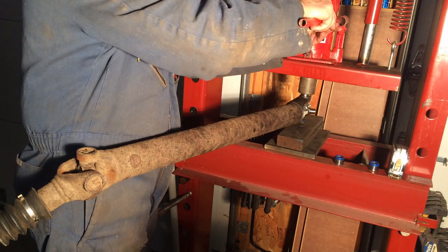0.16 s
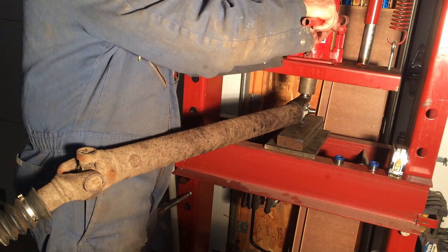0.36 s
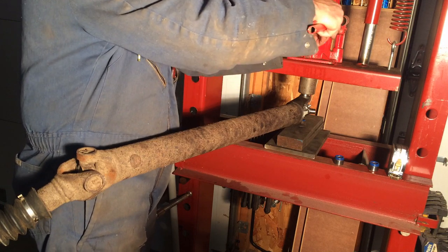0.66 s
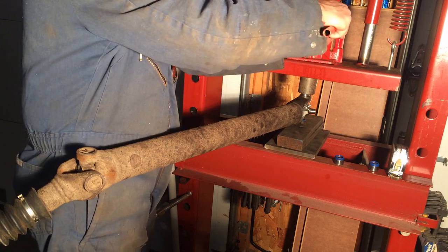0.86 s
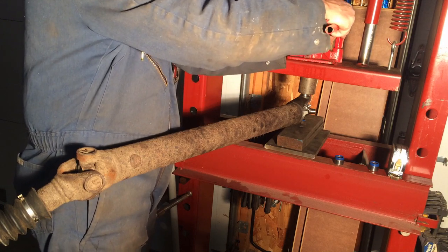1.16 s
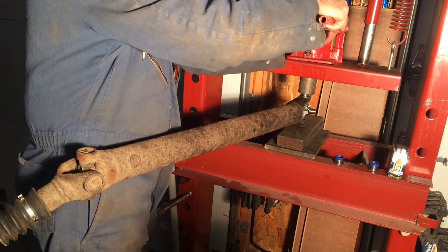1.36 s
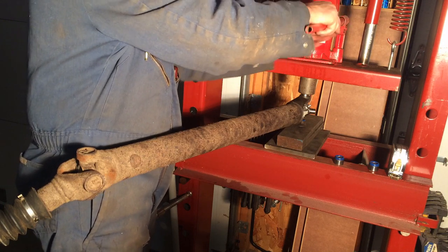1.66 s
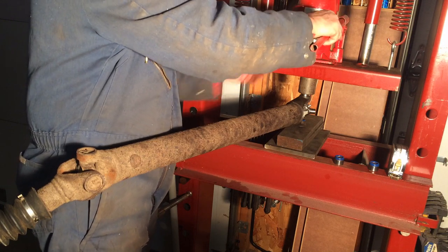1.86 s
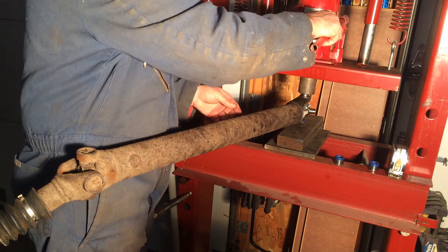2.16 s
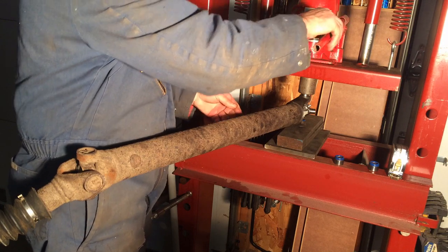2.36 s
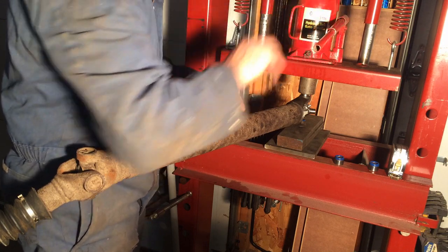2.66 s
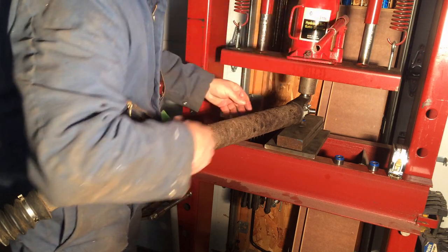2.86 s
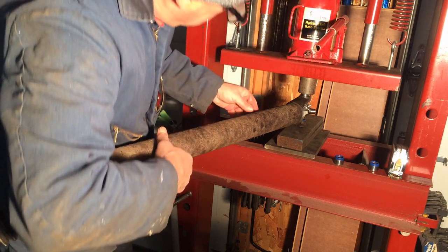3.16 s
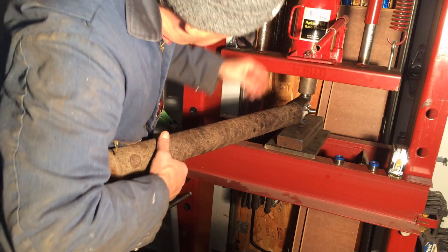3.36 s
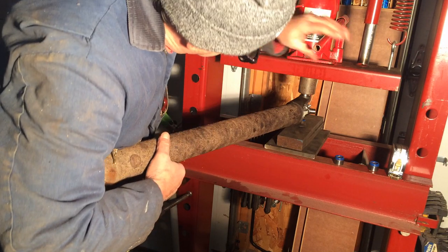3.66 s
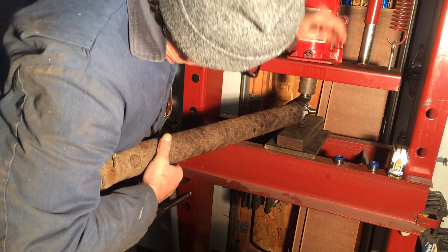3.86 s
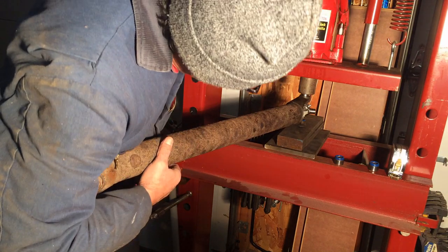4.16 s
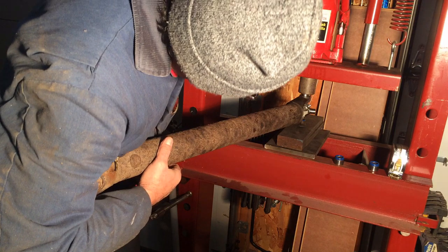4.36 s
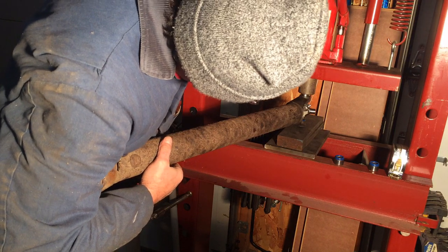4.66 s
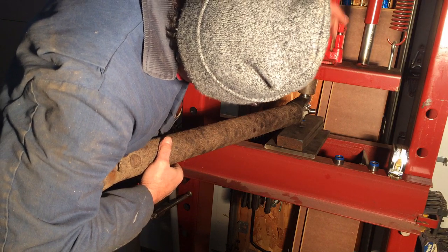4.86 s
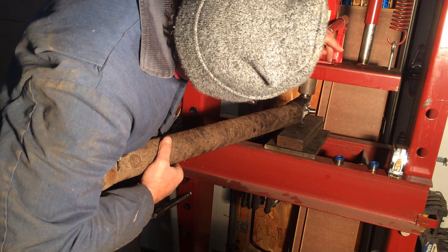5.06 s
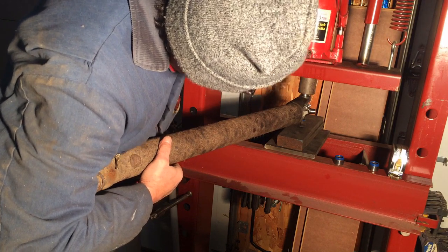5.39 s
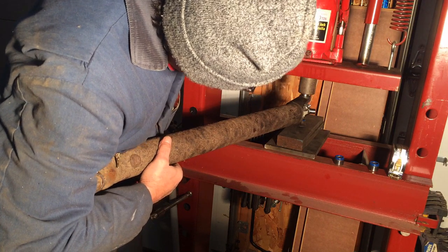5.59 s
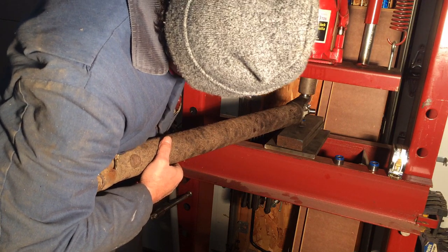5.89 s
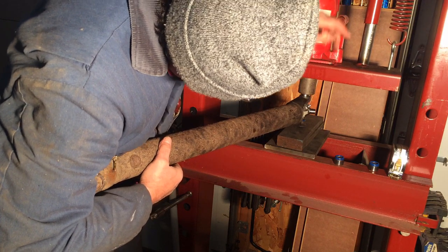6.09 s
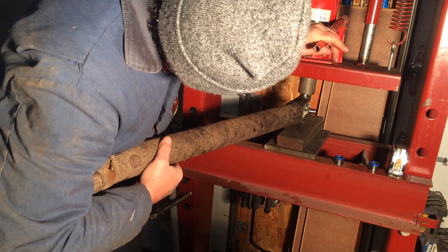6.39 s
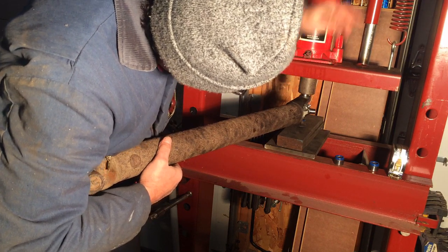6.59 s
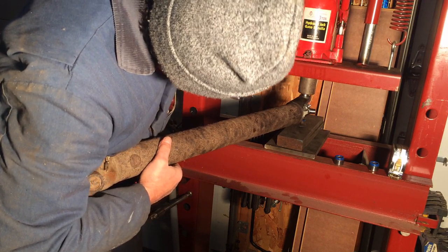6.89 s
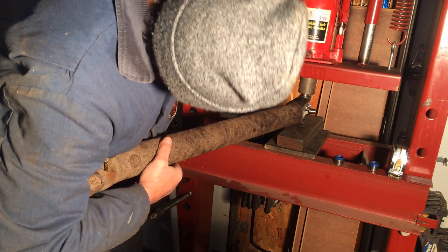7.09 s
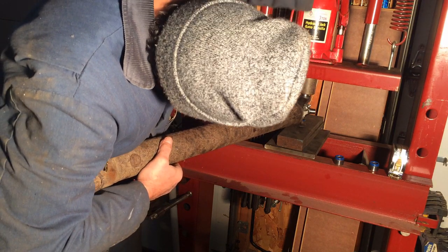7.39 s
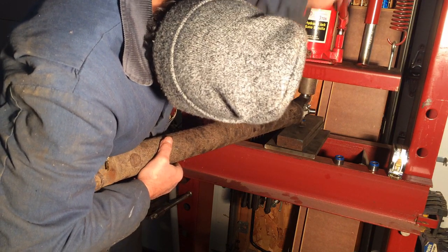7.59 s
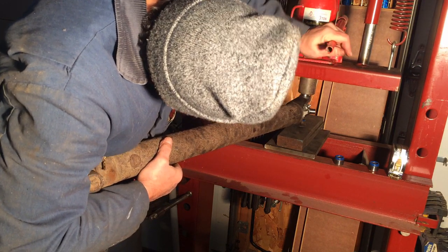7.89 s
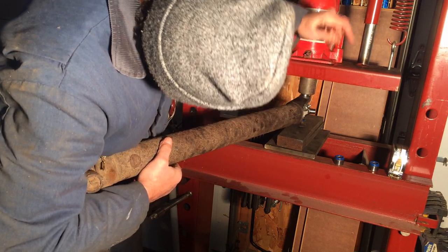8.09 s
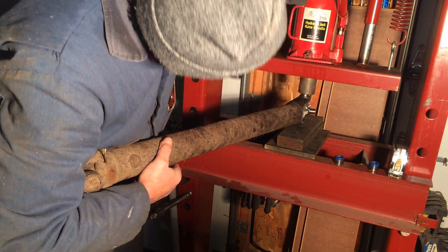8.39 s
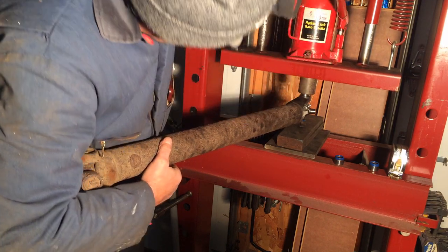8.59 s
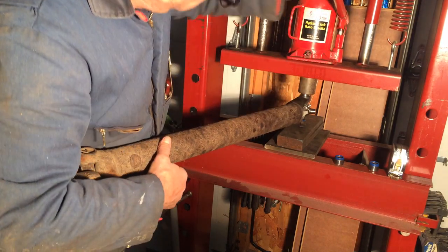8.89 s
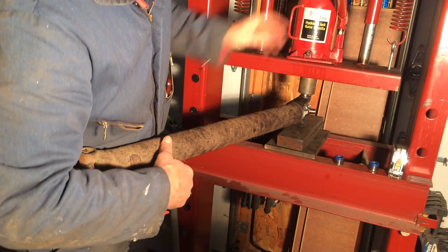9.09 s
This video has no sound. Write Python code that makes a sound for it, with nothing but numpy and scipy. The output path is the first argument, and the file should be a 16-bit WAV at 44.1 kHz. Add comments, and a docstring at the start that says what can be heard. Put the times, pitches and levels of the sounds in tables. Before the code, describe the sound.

Close, single-channel sound of a loose metal lever working on a heavy steel frame. Small ticks and faint scrapes lead to a bright snap near the middle, then louder repeated clinks, woody-dull metal knocks and solid clacks with a small bounce. Springs hum with a beating ring after the hits. The small garage answers with short reflections over very quiet, low-toned air.

```python
"""A steel bottle jack in a shop press is pumped by hand: its lever clinks, knocks and clacks in a small garage.
Each contact is a filtered noise crack plus struck steel modes and a short echo tail.
The press frame and return springs ring on as decaying sines and beating clusters of close modes.
Filtered noise makes the rubbing linkage, the brushing sleeve and the still air; slow sines hum and rumble."""
import sys
import numpy as np
from scipy import signal
from scipy.fft import rfft, irfft, next_fast_len
from scipy.io import wavfile
from scipy.ndimage import map_coordinates

SR = 44100
rng = np.random.default_rng(int(sys.argv[2]) if len(sys.argv) > 2 else 0)


def generate_wav(sig):
    """Save sig (samples, or channels by samples) to the path in sys.argv[1] as 16-bit PCM at SR."""
    pcm = np.round(np.clip(np.atleast_2d(sig).T, -1, 1) * 32767).astype(np.int16)
    wavfile.write(sys.argv[1], SR, pcm)


N = 407484
TIME = np.arange(N) / SR
AFTER = TIME[:SR]  # the second that follows a contact


def amp(db):
    """Turn decibels into a plain gain."""
    return 10 ** (np.asarray(db) / 20)


def unit(x):
    """Scale a sound to an average (RMS) level of one."""
    return x / np.sqrt(np.mean(x ** 2) + 1e-20)


def fade(t, t60):
    """Exponential decay, down 60 dB at t60 seconds."""
    return np.exp(-np.log(1000) * t / t60)


def along(points, hz):
    """Read a curve of (Hz, value) points on a log frequency axis."""
    f, v = np.transpose(points)
    return np.interp(np.log(hz + 1), np.log(f + 1), v)


def wobble(rate, size):
    """A smooth random curve with rate knots a second."""
    knots = rng.standard_normal(int(size * rate / SR) + 4)
    return map_coordinates(knots, [np.arange(size) * rate / SR])


def coloured(x, spectrum, ripple_db=0):
    """Filter x without pre-echo; crowded resonances ripple its spectrum."""
    size = 2 * next_fast_len(len(x) // 2 + 4096)
    hz = np.fft.rfftfreq(size, 1 / SR)
    ripple = map_coordinates(rng.standard_normal(400), [hz / 60]) * hz / (hz + 600)
    gain = amp(along(spectrum, hz) + ripple_db * ripple)
    # folding the cepstrum forward in time makes the filter minimum-phase
    cepstrum = irfft(np.log(gain + 1e-6))
    cepstrum[1:size // 2] *= 2
    cepstrum[size // 2 + 1:] = 0
    return irfft(rfft(x, size) * np.exp(rfft(cepstrum)))[:len(x)]


def registers(x):
    """Split a sound into thump, body and sparkle at 1200 and 5000 Hz."""
    edges = [(1200, "lowpass"), ([1200, 5000], "bandpass"), (5000, "highpass")]
    filters = [signal.butter(4, hz, kind, fs=SR, output="sos") for hz, kind in edges]
    return [signal.sosfilt(sos, x) for sos in filters]


def add(track, s, sound):
    """Mix a sound in at s seconds."""
    room_left = track[round(s * SR):]
    room_left[:len(sound)] += sound[:len(room_left)]


def swell(middle, length):
    """A bell-shaped stroke."""
    return np.exp(-2 * ((TIME - middle) / length) ** 2)


# Echo decay of the garage. Each row: frequency in Hz, time to fall 60 dB in seconds.
GARAGE_DECAY = [(150, 0.37), (300, 0.3), (800, 0.42), (2500, 0.4), (5000, 0.31), (8000, 0.3), (14000, 0.19)]


def garage_tail():
    """Diffuse echoes; each frequency dies at its own speed."""
    hz, t, z = signal.stft(rng.standard_normal(SR), SR, nperseg=256)
    decay = fade(t, along(GARAGE_DECAY, hz)[:, None])
    return signal.istft(z * decay, SR, nperseg=256)[1][:SR]


def ring(modes, t, t60, damping, scatter_db):
    """Steel modes struck at new strengths; t60 holds at 1 kHz and higher modes die sooner."""
    hz, db = np.transpose(modes)
    gain = amp(db - db.max() + scatter_db * rng.standard_normal(len(hz)))
    phase = rng.uniform(0, 2 * np.pi, (len(hz), 1))
    life = t60 * (hz / 1000) ** -damping
    return gain @ (np.sin(2 * np.pi * hz[:, None] * t + phase) * fade(t, life[:, None]))


def strength(x):
    """The average (RMS) level of the first 20 ms."""
    return np.sqrt(np.mean(x[:SR // 50] ** 2))


def contacts(rows, colour, modes, impact_db, crack_t60, snap_db, room_db, ring_db, ring_t60, damping, ripple_db):
    """Steel meets steel: a snap, a crack of dense modes, the ring of the struck part and the garage's answer."""
    track = np.zeros(N)
    # Each row: start in seconds, body level in dB, thump and sparkle in dB against it, rise in seconds.
    for s, db, thump, sparkle, rise in rows:
        decay = fade(AFTER, crack_t60) + amp(snap_db) * fade(AFTER, 0.032)
        crack = rng.standard_normal(SR) * decay
        crack[SR // 1000] += amp(impact_db)  # a single sharp pulse 1 ms into the crack
        blow = coloured(crack + amp(room_db) * garage_tail(), colour, ripple_db)
        struck = ring(modes, AFTER, ring_t60, damping, scatter_db=-0.5)
        blow = blow / strength(blow) + amp(ring_db) * struck
        # a glancing contact builds up slowly, and the heavy frame follows later still
        low, body, high = registers(blow * (1 - np.exp(-AFTER / max(rise, 1e-4))))
        low = low * (1 - np.exp(-AFTER / 0.0055))
        for part, rel in ((low, thump), (body, 0), (high, sparkle)):
            add(track, s, amp(db + rel) * part / strength(part))
    return track


# Tone of the garage air. Each row: frequency in Hz, relative level in dB per Hz.
AIR_COLOUR = [(20, -40.5), (35, -14), (48, -13), (70, -6), (130, -11), (250, -17.5), (400, -17), (700, -22),
              (1500, -27.5), (3000, -32), (9000, -35), (16000, -37.5)]
# Hum tones. Each row: frequency in Hz, level in dB before the lift that follows.
HUM_TONES = [(53.8, -75), (220.7, -84.5)]


def background(air_db, hum_lift_db, waver):
    """Still garage air as filtered noise, and low hum sines whose phase (waver) and level drift."""
    air = unit(coloured(rng.standard_normal(N), AIR_COLOUR))
    hum = np.zeros(N)
    for hz, db in HUM_TONES:
        drift = waver * wobble(3.3, size=N)
        level = amp(3.2 * wobble(6, size=N))
        hum += amp(db) * unit(np.sin(2 * np.pi * hz * TIME + drift) * level)
    return amp(air_db) * air + amp(hum_lift_db) * hum


# Weight shifting on the floor. Each row: middle in seconds, length in seconds, frequency in Hz, level in dB.
FLOOR_RUMBLES = [(8.228, 0.09, 85, -77), (8.683, 0.036, 90, -69), (9.162, 0.16, 89.7, -66)]


def rumbles():
    """Dull swells of the floor under shifting feet, each a low sine with a drifting phase."""
    track = np.zeros(N)
    for s, length, hz, db in FLOOR_RUMBLES:
        tone = np.sin(2 * np.pi * hz * TIME + wobble(17, size=N))
        track += amp(db) * swell(s, length) * unit(tone)
    return track


# Sleeve swishes. Each row: middle in seconds, length in seconds, level in dB.
SLEEVE_SWISHES = [(2.518, 0.064, -67.5), (3.515, 0.069, -66), (7.523, 0.078, -68), (8.512, 0.063, -66.5)]
# Tone of the cloth. Each row: frequency in Hz, relative level in dB per Hz.
CLOTH_COLOUR = [(200, -14), (1000, -5), (2500, -10.5), (5500, -8.5), (9000, -20), (16000, -28.5)]


def sleeve(grain_db):
    """The overall's cloth brushes in small catches as the arm moves."""
    catches = rng.standard_normal(N) * amp(grain_db * wobble(180, size=N))
    strokes = sum(amp(db) * swell(s, length) for s, length, db in SLEEVE_SWISHES)
    return unit(coloured(catches, CLOTH_COLOUR, ripple_db=4)) * strokes


# Slack linkage shifting. Each row: middle in seconds, length in seconds, level in dB, groan in dB against it.
LINKAGE_RUBS = [(.9, 0.063, -89, 21), (1.289, 0.024, -82.5, 21.5), (1.514, 0.055, -70.5, -8),
                (1.635, .06, -68, 4), (2.223, 0.18, -71.5, 0.5), (4.073, 0.073, -59, 2)]
# Tone of the rubbing steel. Each row: frequency in Hz, relative level in dB per Hz.
SCRAPE_COLOUR = [(100, -21), (300, 11.5), (900, 3), (1500, -1), (4500, -9.5), (8000, -16.5), (11000, -20),
                 (13300, -14), (16000, -23.5)]
SLIDE_DB, SLIDE_GROAN_DB, SLIDE_LEAD_S = -62, 3.5, 0.015  # a slide peaks just before each stop


def rubbing(grain_db):
    """The linkage slides in small uneven slips, between strokes and on its way down to the stop."""
    slips = rng.standard_normal(N) * amp(grain_db * wobble(400, size=N))
    low, body, high = registers(coloured(slips, SCRAPE_COLOUR, ripple_db=3.0))
    slides = [(s - SLIDE_LEAD_S, length, SLIDE_DB, SLIDE_GROAN_DB) for s, *_, length in STOP_CLACKS]
    scrape, groan = np.zeros(N), np.zeros(N)
    for s, length, db, groan_db in LINKAGE_RUBS + slides:
        stroke = amp(db) * swell(s, length)
        scrape += stroke
        groan += amp(groan_db) * stroke
    return scrape * unit(body + high) + groan * unit(low)


# Jolts that pass into the press. Each row: start in seconds, frame level in dB, springs level in dB.
PRESS_JOLTS = [(4.02, -50, -83.5), (4.47, -48.5, -63.5), (5.884, -51.5, -64), (7.187, -56, -64),
               (8.768, -45, -69.5)]
# Modes of the return springs. Each row: frequency in Hz, relative level in dB.
SPRING_MODES = [(217, -11), (287, -11.5), (419, -7), (643, -6), (848, -1), (864, -5), (883, -1),
                (911, -4.5), (976, -10.5), (1205, -11.5), (1323, -20.5), (1631, -13.5), (1723, -12.5),
                (1965, -14.5), (2213, -20), (2891, -18), (6317, -17.5), (11919, -26.5)]


def springs(t60, detune, flutter_db):
    """The two return springs are slightly out of tune with each other, so their long ring beats."""
    track, t = np.zeros(N), TIME[:2 * SR]
    for s, _, db in PRESS_JOLTS:
        for tuning, rel in ((1 - detune, 0), (1 + detune, -4)):
            song = ring(np.array(SPRING_MODES) * [tuning, 1], t, t60, damping=0.071, scatter_db=-2.5)
            flutter = amp(flutter_db * wobble(49, size=len(t)))
            add(track, s, amp(db + rel) * song * flutter * (1 - np.exp(-t / 0.02)))
    return track


# Clusters that sing on after a knock (lever) or a jolt (frame, springs).
# Each row: frequency in Hz, width in Hz, level in dB against the blow, time to fall 60 dB in seconds.
LEVER_CLUSTERS = [(438, 25.6, -21.5, 1.9), (1322, 170, -1.5, 0.32), (1910, 380, -9.5, 0.24)]
FRAME_CLUSTERS = [(293.3, 71, -1, .55)]
SPRING_CLUSTERS = [(870, 70, 2, 2.4), (973, 72, 13, .7)]
# Parts that one contact leaves free to sing.
# Each row: start in seconds, frequency in Hz, width in Hz, level in dB, time to fall 60 dB in seconds.
FREE_PARTS = [(.466, 1220, 950, -53, 0.3), (.492, 4870, 2200, -45, .22), (1.311, 2860, 1600, -48.5, .22),
              (1.803, 4470, 100, -46.5, 0.25), (4.089, 1790, 160, -49, .39),
              (8.304, 2660, 740, -47.5, 0.26), (8.769, 1635, 9, -69, 2)]


def zings():
    """A pin or plate rings in a cluster of close modes that beat and blur into one pitch."""
    blows = [(s, db, LEVER_CLUSTERS) for s, db, *_ in LOAD_KNOCKS]
    for s, frame_db, springs_db in PRESS_JOLTS:
        blows += [(s, frame_db, FRAME_CLUSTERS), (s, springs_db, SPRING_CLUSTERS)]
    clusters = [(s, hz, width, db + rel, t60) for s, db, song in blows for hz, width, rel, t60 in song]
    track = np.zeros(N)
    for s, hz, width, db, t60 in clusters + FREE_PARTS:
        # a random complex curve spreads one tone over the width of the cluster
        beating = wobble(width, size=SR) + 1j * wobble(width, size=SR)
        tone = unit(np.real(beating * np.exp(2j * np.pi * hz * AFTER)))
        add(track, s, amp(db) * tone * fade(AFTER, t60) * (1 - np.exp(-AFTER / 0.002)))
    return track


# The lever takes up the load. Each row: start in seconds, level in dB, sparkle in dB against it, rise in seconds.
LOAD_KNOCKS = [(2.002, -50.5, -15.5, 0.0046), (5.185, -51, -19.5, .0002), (6.403, -49, -18, .0008),
               (7.096, -47.5, -10.5, .001), (7.9639, -41, -13.5, 0.0012)]
# Tone of a knock. Each row: frequency in Hz, relative level in dB per Hz.
KNOCK_TONE = [(40, -39.5), (100, -9), (200, -5), (300, 4), (450, 5), (900, -3), (1070, -6), (1350, -8.5),
              (2000, -5.5), (3100, -14), (3800, -14), (4800, -22.5), (8000, -30.5), (16000, -47)]
# Modes of the loaded lever. Each row: frequency in Hz, relative level in dB.
LEVER_MODES = [(320, -2), (452, 9), (686, 2.5), (848, 3.5), (923, 7), (1273, 0), (1373, -9.5),
               (1421, -25.5), (1739, 2), (1992, -2.5), (2509, 1), (3674, -14.5), (3868, 0.5), (4062, -11.5)]
KNOCK_THUMP_DB = -1.5  # against the level


def knocks():
    """One dull blow each time the lever takes up the load."""
    rows = [(s, db, KNOCK_THUMP_DB, sparkle, rise) for s, db, sparkle, rise in LOAD_KNOCKS]
    return contacts(rows, KNOCK_TONE, LEVER_MODES, impact_db=7.5, crack_t60=0.15, snap_db=-18.0,
                    room_db=-7.0, ring_db=-8, ring_t60=0.38, damping=0.35, ripple_db=1.5)


# At the top of a stroke the pin crosses its play. Each row: start in seconds, crossing time in seconds,
# leaving level, its thump and its sparkle in dB, then seating level, its thump and its sparkle in dB;
# thump and sparkle are against their level.
PIN_RATTLES = [(.466, .0255, -56.5, 0, -16, -52, -7, -4.5), (1.302, 0.0065, -58, -1.5, -3, -43.5, -16, -5),
               (4.016, 0.076, -51.5, -6.5, -0.5, -44, -6, -10), (5.44, 0.038, -45, -10, -1, -39, -8, -3),
               (6.75, .044, -44.5, -20, -2.5, -40, -5, -0.5),
               (8.3015, .0215, -49.5, -10, -3, -57.5, -1.5, 1.5)]
# Single snaps of the linkage. Each row: start in seconds, level in dB, sparkle in dB against it.
LINKAGE_SNAPS = [(.627, -58.5, -12.5), (1.012, -75.5, 1.5), (1.48, -74, 3), (1.581, -68, 2),
                 (1.938, -64, -18), (1.973, -72, 4.5), (3.82, -74.5, -19), (4.39, -66.5, -14.5),
                 (4.4635, -31.5, 0), (5.415, -62.5, -11), (5.705, -63, -9), (5.854, -58.5, 3.5),
                 (6.728, -59.5, -12), (7.046, -54, -21), (7.152, -57.5, -2), (8.675, -60.5, -8),
                 (8.709, -56.5, -3)]
# Tone of a clink. Each row: frequency in Hz, relative level in dB per Hz.
CLINK_TONE = [(40, -43.5), (100, -16), (200, -17.5), (290, -2.5), (420, -10), (620, -1), (1150, -9.5),
              (1800, -2), (2700, 2.5), (4000, -2), (5500, -9.5), (8000, -11), (11000, -18), (16000, -18.5)]
# Modes of the linkage. Each row: frequency in Hz, relative level in dB.
LINKAGE_MODES = [(291, -10), (611, -6.5), (684, -8.5), (840, -6.5), (1750, -3), (1951, -5.5), (2678, -2),
                 (2716, -4.5), (3970, -6.5), (5461, -20.5), (6124, -11), (9286, -14.5), (12522, -21.5)]
LEAVE_RISE_S, SEAT_RISE_S = .001, .002
# the chatter comes at a share of the crossing; its level and sparkle are against the leaving snap
CHATTER_SHARE, CHATTER_DB, CHATTER_BRIGHT_DB, CHATTER_RISE_S = .54, -1.5, 3, .008
# the rise holds at the reference level and is ten times shorter for each quicken step above it
SNAP_THUMP_DB, SNAP_RISE_S, SNAP_REF_DB, SNAP_QUICKEN_DB = -5, .0015, -55.5, 46.5


def clinks():
    """The pin leaves one side of its hole, chatters across and seats; harder single snaps are sharper."""
    rows = []
    for s, crossing, leave, leave_thump, leave_sparkle, seat, seat_thump, seat_sparkle in PIN_RATTLES:
        chatter_thump = (leave_thump + seat_thump) / 2
        chatter_sparkle = leave_sparkle + CHATTER_BRIGHT_DB
        rows += [(s, leave, leave_thump, leave_sparkle, LEAVE_RISE_S),
                 (s + CHATTER_SHARE * crossing, leave + CHATTER_DB, chatter_thump, chatter_sparkle, CHATTER_RISE_S),
                 (s + crossing, seat, seat_thump, seat_sparkle, SEAT_RISE_S)]
    for s, db, sparkle in LINKAGE_SNAPS:
        rise = SNAP_RISE_S * 10 ** ((SNAP_REF_DB - db) / SNAP_QUICKEN_DB)
        rows.append((s, db, SNAP_THUMP_DB, sparkle, rise))
    return contacts(rows, CLINK_TONE, LINKAGE_MODES, impact_db=20.0, crack_t60=0.11, snap_db=4.0,
                    room_db=-5.5, ring_db=-15, ring_t60=0.34, damping=.08, ripple_db=2.5)


# The lever hits its stop. Each row: start in seconds, level in dB, thump and sparkle in dB against it,
# how much earlier the lever grazes the stop in seconds, that graze in dB against the level,
# length of the slide before it in seconds.
STOP_CLACKS = [(1.802, -46, -7, -8, .011, 2, 0.11), (4.57, -41, 5, -6.5, .014, -2, 0.2),
               (5.884, -34.5, -1, -0.5, .007, -6.5, 0.14), (7.1873, -36.5, 1.5, 0, 0.009, -10.5, 0.025),
               (8.768, -38.5, .5, -1.5, .016, -1, .04)]
# Tone of a clack. Each row: frequency in Hz, relative level in dB per Hz.
CLACK_TONE = [(40, -54.5), (100, -23.5), (215, -24), (285, -4.5), (420, -13), (620, -7), (900, -6),
              (1120, -14.5), (1800, -11.5), (3000, -14.5), (6400, -16.5), (7400, -26.5), (9000, -19.5),
              (11000, -41)]
# Modes of the jack on its frame. Each row: frequency in Hz, relative level in dB.
FRAME_MODES = [(285, -9.5), (320, 1.5), (339, 1), (595, -2.5), (638, -5.5), (686, -5.5), (845, -20),
               (883, 4), (982, -5.5), (1270, -6), (1370, -21.5), (1747, -2.5), (1954, -5.5), (2358, 0.5),
               (2719, -8.5), (3305, -18), (3854, -7.5), (4352, -24.5), (6070, -16), (6320, -9.5),
               (6514, 0.5), (9022, -23), (9122, -20.5)]
# the graze has less sparkle, and a rise that is a share of its lead
GRAZE_DULL_DB, GRAZE_RISE_SHARE = 9.5, 0.34
BOUNCE_S, BOUNCE_LOSS_DB, HARD_RISE_S = .02, 10.5, .0002


def clacks():
    """The lever grazes its stop, lands and bounces once."""
    rows = []
    for s, db, thump, sparkle, lead, graze, _ in STOP_CLACKS:
        rows += [(s - lead, db + graze, thump - 3, sparkle - GRAZE_DULL_DB, GRAZE_RISE_SHARE * lead),
                 (s, db, thump, sparkle, HARD_RISE_S),
                 (s + BOUNCE_S, db - BOUNCE_LOSS_DB, thump, sparkle - 4, HARD_RISE_S)]
    return contacts(rows, CLACK_TONE, FRAME_MODES, impact_db=20.5, crack_t60=0.09, snap_db=-3.5,
                    room_db=-9, ring_db=-9.5, ring_t60=0.36, damping=0.21, ripple_db=3.5)


def scene():
    """The still garage, the arm and the pump strokes, summed into one channel."""
    garage = background(air_db=-69.67, hum_lift_db=1.5, waver=.4) + rumbles()
    arm = sleeve(grain_db=3.5)
    ringing = springs(t60=2.74, detune=0.0039, flutter_db=1.5) + zings()
    press = rubbing(grain_db=3.0) + ringing + knocks() + clinks() + clacks()
    return (garage + arm + press)[None]


TOP_HZ = 16100


def record(dry):
    """Remove everything from the band limit upwards."""
    size = next_fast_len(N + SR // 2)
    kept = np.fft.rfftfreq(size, 1 / SR) < TOP_HZ
    return irfft(rfft(dry, size) * kept, size)[..., :N]


dry = scene()
out = record(dry)
generate_wav(out)
```